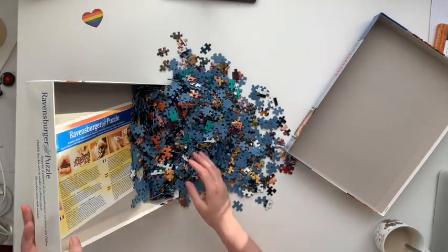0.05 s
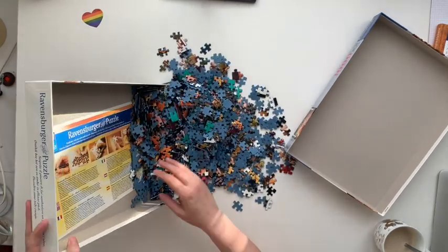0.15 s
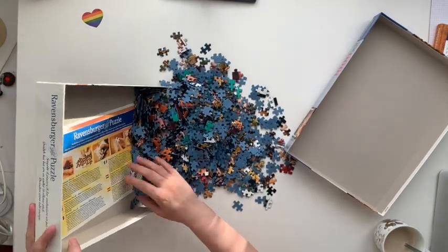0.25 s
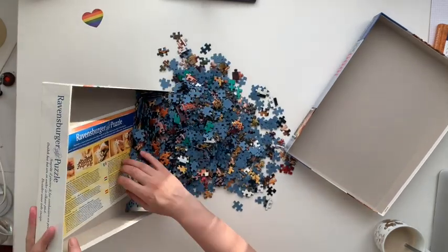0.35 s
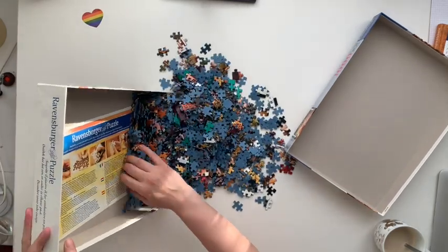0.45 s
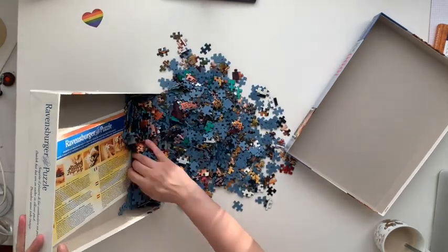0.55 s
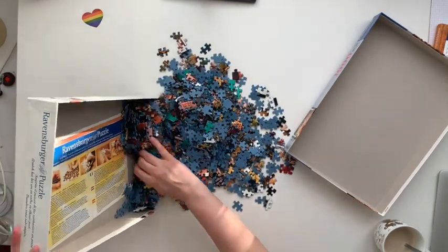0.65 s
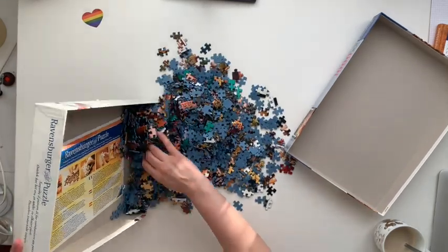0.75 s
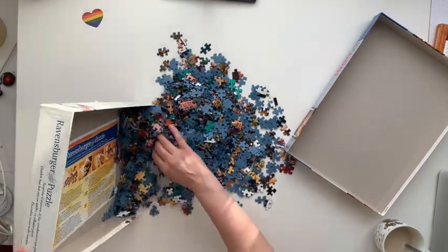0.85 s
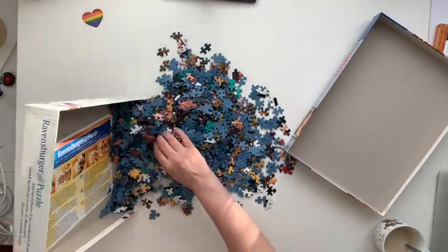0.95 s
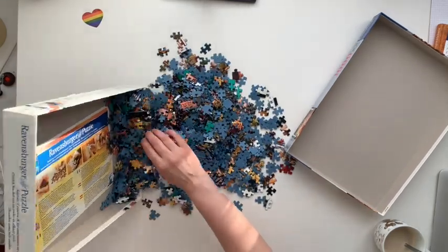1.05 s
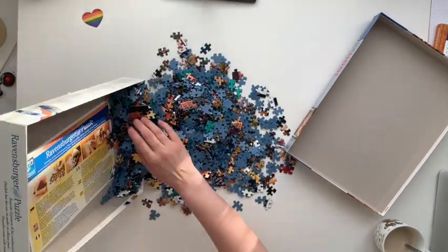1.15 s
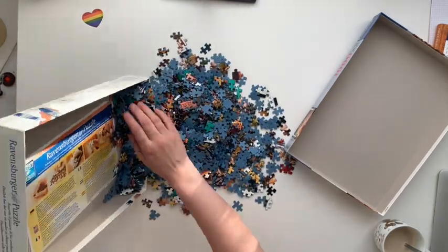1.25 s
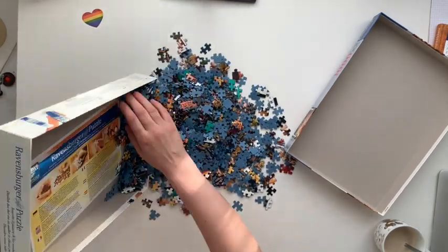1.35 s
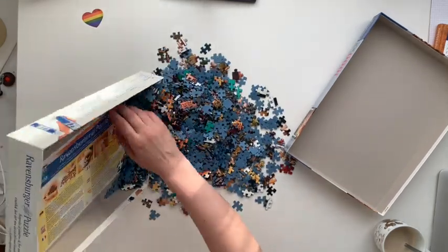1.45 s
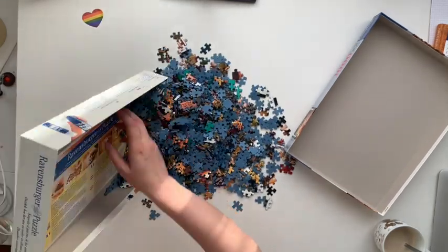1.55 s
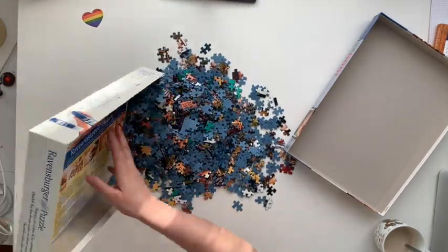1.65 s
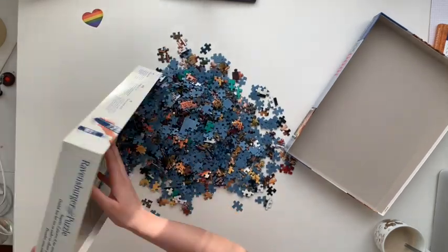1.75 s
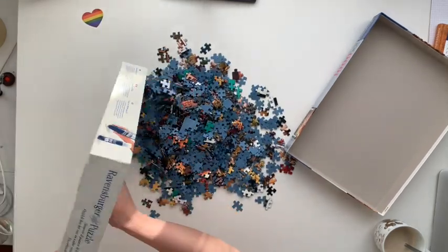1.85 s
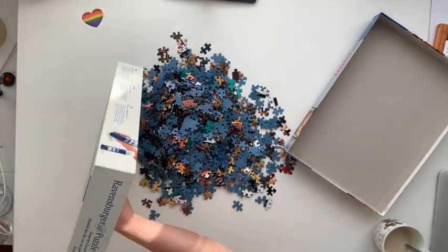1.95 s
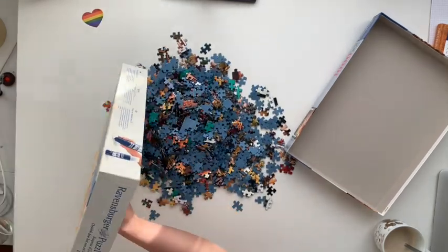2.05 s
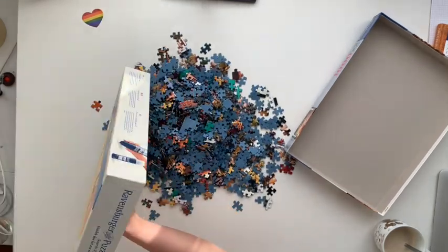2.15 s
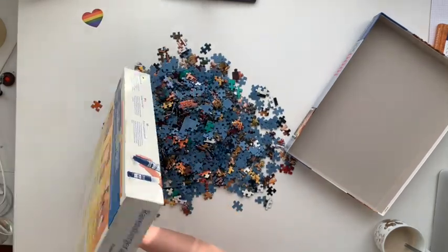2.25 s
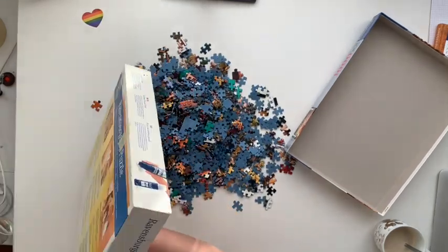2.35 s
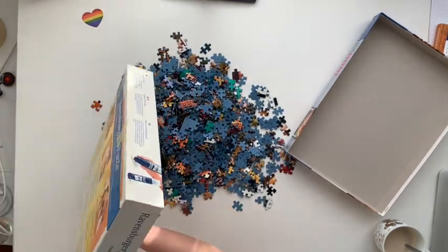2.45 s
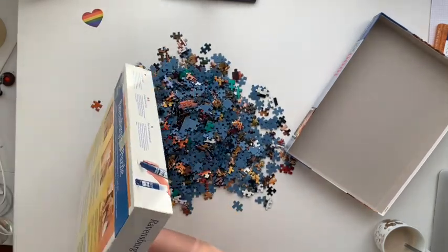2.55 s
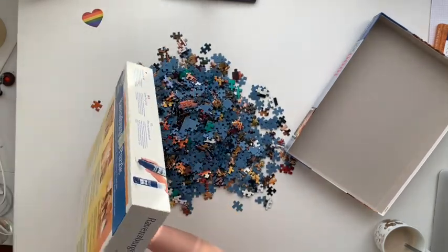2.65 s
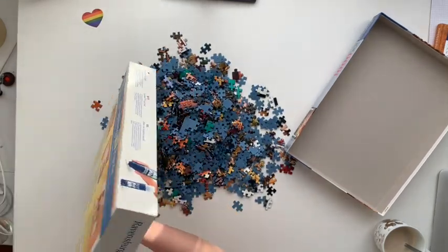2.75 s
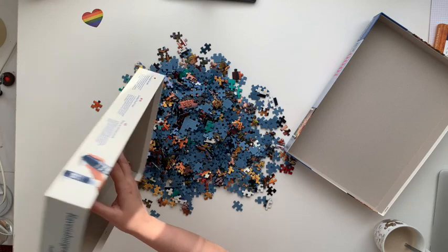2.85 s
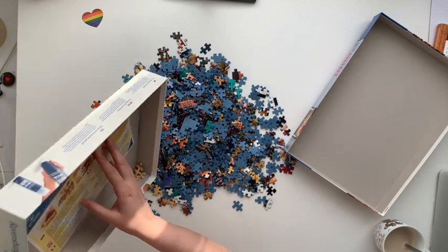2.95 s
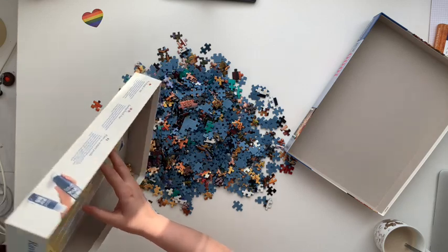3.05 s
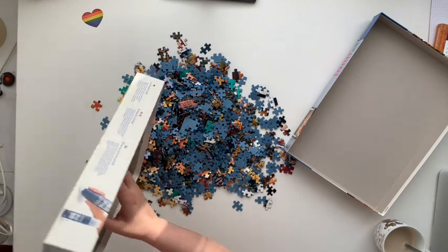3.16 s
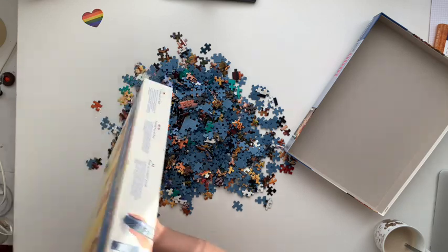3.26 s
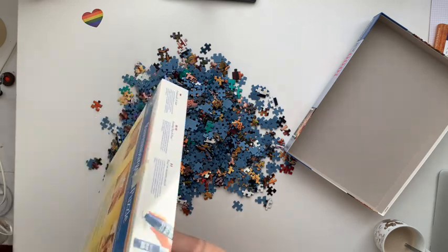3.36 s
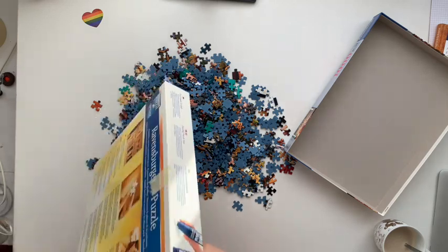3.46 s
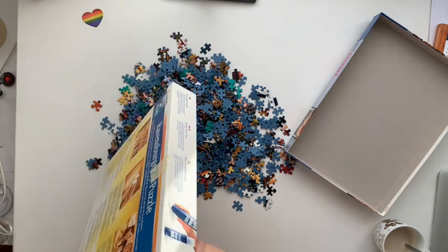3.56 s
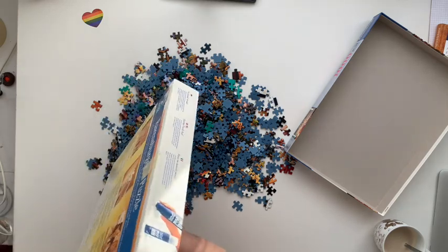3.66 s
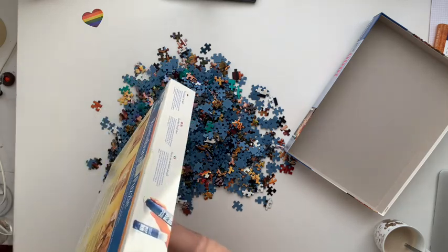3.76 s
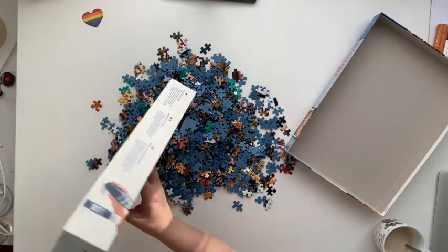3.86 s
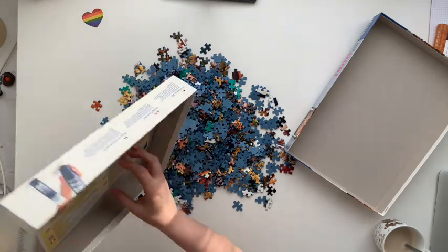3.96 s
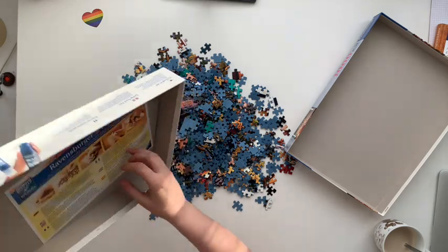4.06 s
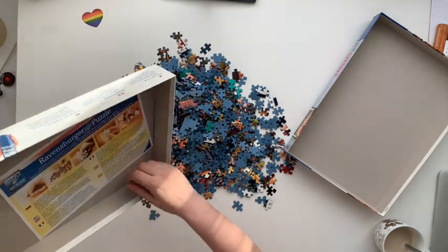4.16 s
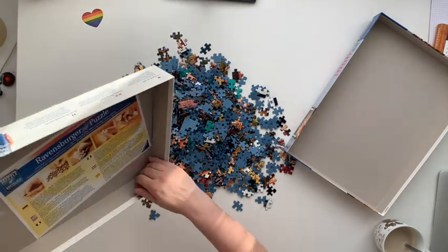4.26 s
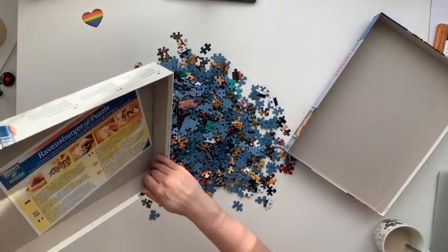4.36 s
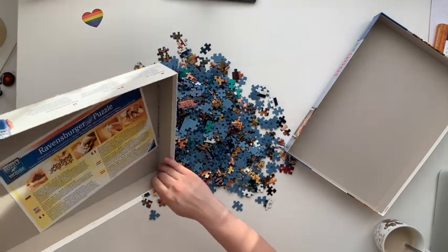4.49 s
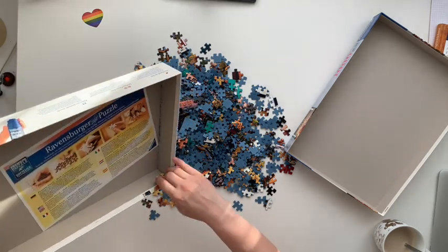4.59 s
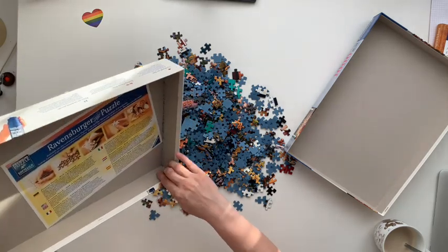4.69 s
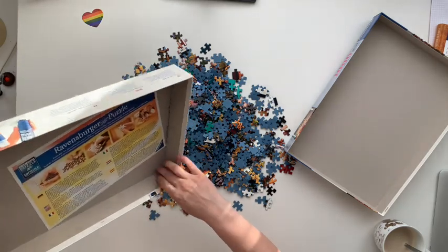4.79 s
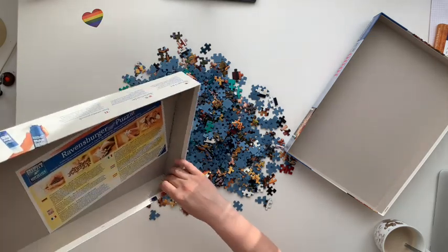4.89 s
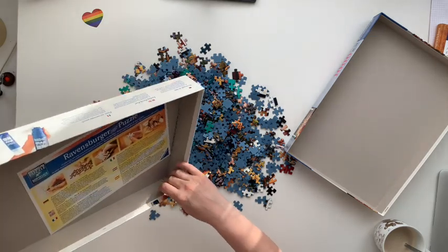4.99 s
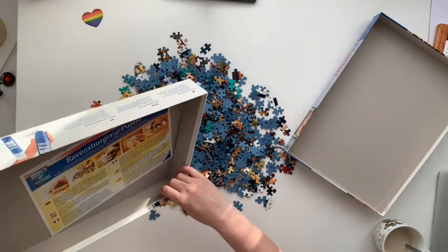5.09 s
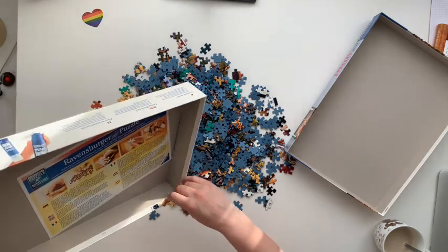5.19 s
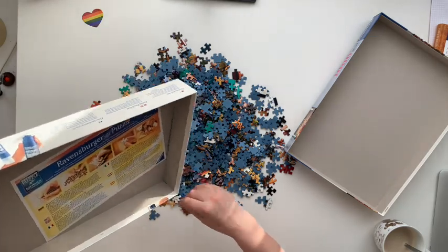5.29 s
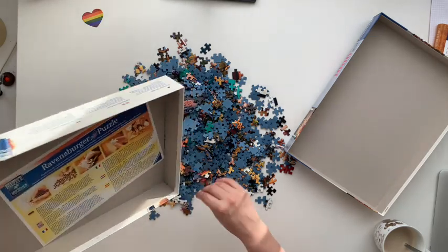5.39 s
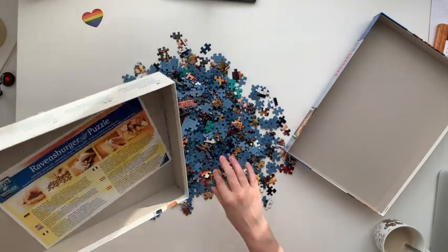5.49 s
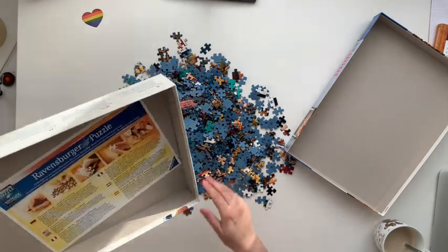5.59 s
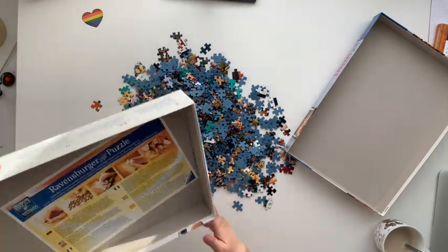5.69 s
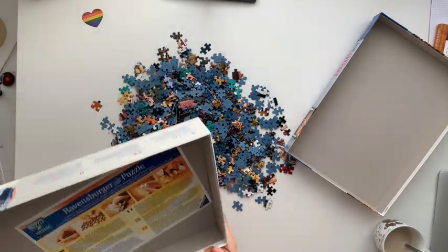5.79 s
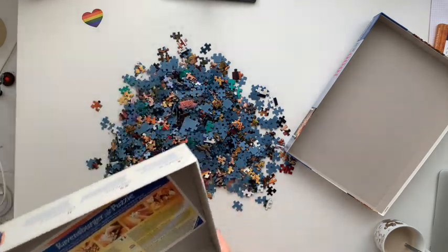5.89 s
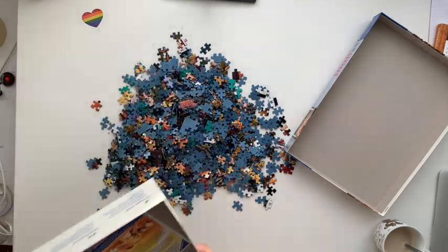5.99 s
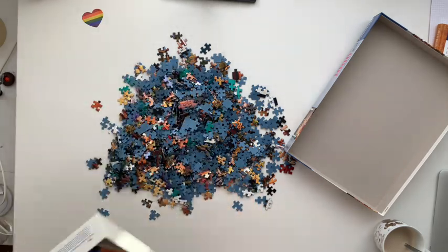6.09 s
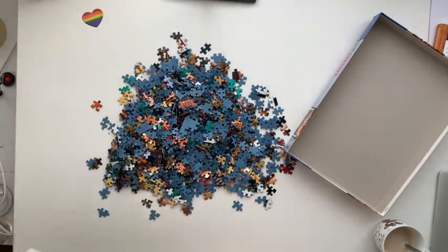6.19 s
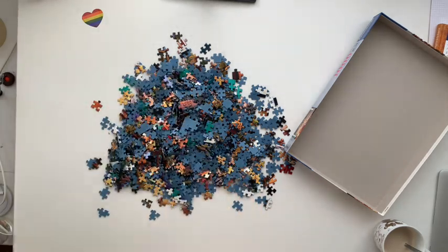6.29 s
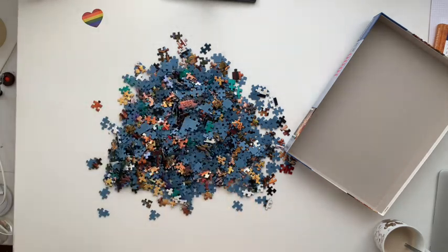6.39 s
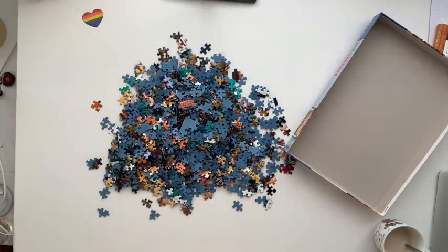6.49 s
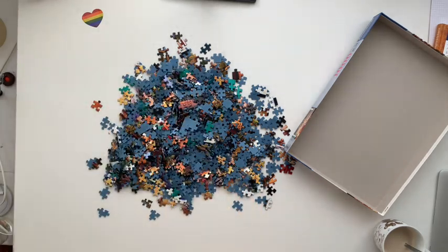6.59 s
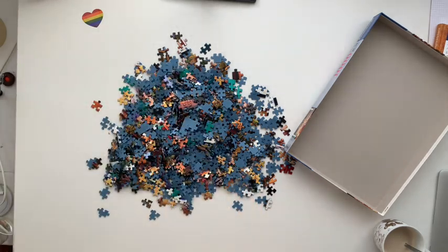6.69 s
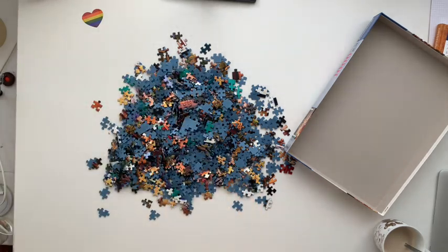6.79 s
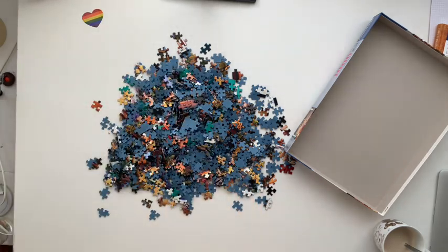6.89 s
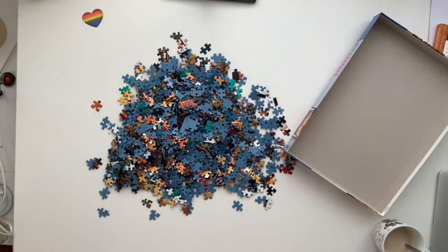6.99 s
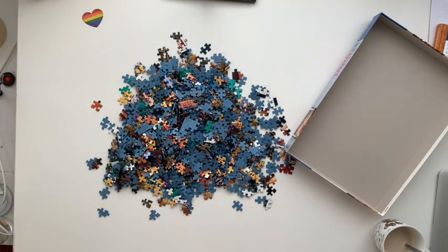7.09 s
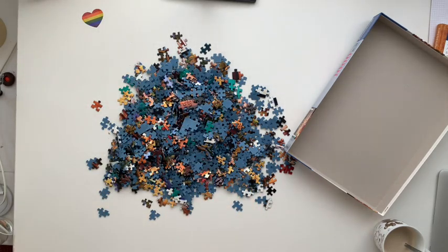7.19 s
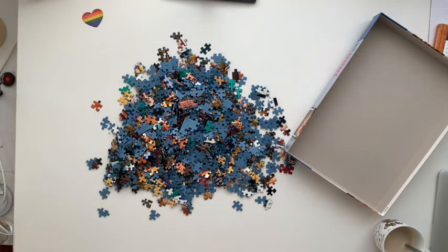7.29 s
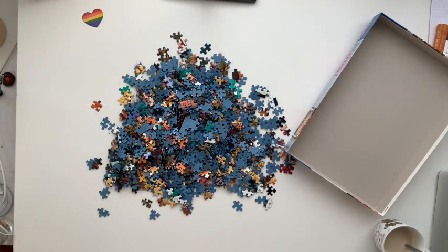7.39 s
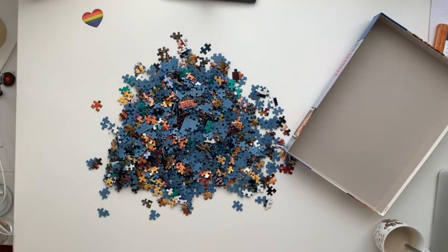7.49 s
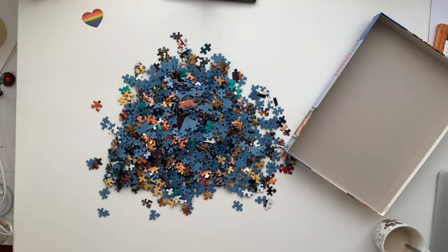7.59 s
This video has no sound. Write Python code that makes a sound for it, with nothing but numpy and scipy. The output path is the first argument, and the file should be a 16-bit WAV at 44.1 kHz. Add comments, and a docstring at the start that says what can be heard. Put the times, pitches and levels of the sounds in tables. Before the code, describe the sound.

In a quiet room, heard in stereo, puzzle pieces spill from a cardboard box onto a table with a dry, rushing rattle that swells with each sweep of a hand. The box edge drags with a short low groan and the tabletop rumbles faintly. Then the last pieces fall in sparse taps and rustles, and a run of dull box bumps fades into faint room tone.

```python
"""Cardboard puzzle pieces clatter and rustle as a hand rakes them out of a tilted box onto a table.
Their collisions ring the card and the air in the box; single pieces tap and hard edges snap.
The pour thins to a soft slide as the box is turned and put away. The box groans as it drags and knocks
as it bumps, and the table rumbles, all heard through a stereo microphone in a quiet room."""
import sys
import numpy as np
from scipy import signal
from scipy.fft import rfft, irfft, next_fast_len
from scipy.io import wavfile
from scipy.ndimage import uniform_filter1d, map_coordinates

SR = 44100
rng = np.random.default_rng(int(sys.argv[2]) if len(sys.argv) > 2 else 0)


def transcribe(signal):
    """Save signal, clipped to [-1, 1], as a 16-bit WAV file at the path in sys.argv[1]."""
    frames = np.atleast_2d(signal).T
    limited = np.clip(frames, -1, 1)
    pcm = np.round(limited * 32767).astype(np.int16)
    wavfile.write(sys.argv[1], SR, pcm)


N = 336924


def amp(db):
    return 10 ** (np.asarray(db) / 20)


def unit(x):
    return x / np.sqrt(np.mean(x ** 2) + 1e-20)


def along(points, hz):
    """Read (freq_hz, value) points on a log frequency axis."""
    freqs, values = np.transpose(points)
    return np.interp(np.log(hz + 1), np.log(freqs + 1), values)


def curves(rows):
    """One automation curve for each column after time_s."""
    times, *columns = np.transpose(rows)
    return [np.interp(np.arange(N) / SR, times, column) for column in columns]


def wobble(rate):
    """A smooth random curve, rate knots a second."""
    return map_coordinates(rng.standard_normal(int(N * rate / SR) + 4), [np.arange(N) * rate / SR])


def filtered(x, response):
    """x through a complex frequency response."""
    size = next_fast_len(N + SR // 2)
    return irfft(rfft(x, size) * response(np.fft.rfftfreq(size, 1 / SR)), size)[..., :N]


def bandpass(f, hz, width):
    return 1j * f * width / (hz * hz - f * f + 1j * f * width)


def resonant(x, modes):
    """x through parallel resonances of alternating polarity."""
    return filtered(x, lambda f: sum((-1) ** k * amp(db) * bandpass(f, hz, width)
                                     for k, (hz, width, db) in enumerate(modes)))


def coloured(x, spectrum):
    """x through an EQ curve, at unit level."""
    return unit(filtered(x, lambda hz: amp(along(spectrum, hz))))


# room tone EQ: freq_hz, gain_db
ROOM_TONE_EQ = [(18, -42.5), (30, -13), (64, -13.5), (97, -11), (213, -26), (622, -33), (4310, -46.5),
                (4660, -55.5), (6370, -39.5), (15500, -39)]
def room_tone():
    """Two channels of faint, bass-heavy air."""
    return amp(-58) * coloured(rng.standard_normal((2, N)), ROOM_TONE_EQ)


# reverb off the room's walls: freq_hz, t60_s
ROOM_DECAY = [(150, 0.24), (400, 0.14), (1400, 0.079), (4000, 0.18), (12000, 0.092)]
# scatter off things on the table: freq_hz, t60_s
SCATTER_DECAY = [(200, 0.017), (3000, 0.027), (12000, 0.00099)]
def reflections(x, decay, length, hop):
    """A diffuse tail of length samples, drawn anew every hop samples."""
    out = np.zeros(N + SR)
    for start in range(0, N, hop):
        hz, t, noise = signal.stft(rng.standard_normal(length), SR, nperseg=128)
        tail = signal.istft(noise * amp(-60 * t / along(decay, hz)[:, None]), SR, nperseg=128)[1]
        wet = signal.fftconvolve(x[start:start + hop], tail / np.linalg.norm(tail))
        out[start + 100:][:len(wet)] += wet
    return out[:N]


# texture, from smooth sliding (0) to separate collisions (1): time_s, grain_share
GRAIN = [(0, 1), (2.95, 1), (3.1, .35), (5.6, .3), (5.85, .12), (7.64, .12)]
def contacts(rate, spread_db, t60, clump_db, smooth):
    """Random collisions in clumps, a few much bigger than the rest, on the hiss of sliding card."""
    hits = rng.random(N) < rate / SR
    sizes = hits * amp(spread_db * np.minimum(rng.exponential(size=N), 4) + clump_db * wobble(25.01))
    envelope = np.convolve(sizes, amp(-60 * np.arange(SR // 40) / SR / t60))[:N]
    grain, = curves(GRAIN)
    return (grain * unit(unit(envelope) + smooth) + 1 - grain) * rng.standard_normal(N)


# tabletop EQ: freq_hz, gain_db
TABLE_EQ = [(28, -44.5), (45, -7.5), (70, -11.5), (110, -7), (160, -10), (205, -3.5), (270, -14.5),
            (500, -55.5)]
# rumble fader: time_s, level_db
RUMBLE_LEVEL = [(0, -47.5), (.19, -70), (.32, -25.5), (.38, -31), (1.1, -44), (1.45, -51.5), (1.6, -37),
                (2, -39.5), (2.8, -43.5), (3.1, -65), (3.55, -48), (4.17, -65), (4.28, -67), (4.36, -69),
                (5.47, -70.5), (5.53, -40), (5.62, -86), (5.75, -60.5), (6.05, -40), (6.5, -41.5),
                (6.6, -63), (6.64, -30), (6.71, -43), (6.75, -68), (7.64, -71.5)]
def table_rumble():
    """Blows shake the low end of the tabletop."""
    blows = contacts(400, spread_db=9, t60=0.018, clump_db=-1, smooth=0.88)
    return amp(curves(RUMBLE_LEVEL)[0]) * coloured(blows, TABLE_EQ)


# box edge dragging on the table: time_s, pitch_hz, level_db
BOX_DRAG = [(1.57, 264, -48.5), (1.591, 250.3, -18), (1.643, 239, -30.5), (1.692, 221.3, -29.5),
            (1.779, 229.2, -29), (1.852, 213, -27.5), (1.9, 183, -39), (1.974, 198, -29), (2.02, 205, -43)]
def box_groan():
    """Stick-slip of the box edge: an unsteady low tone with a weak octave."""
    hz, db = curves(BOX_DRAG)
    t = np.arange(N) / SR
    gate = np.clip(np.minimum(t - BOX_DRAG[0][0], BOX_DRAG[-1][0] - t) / 0.011, 0, 1)
    phase = 2 * np.pi * np.cumsum(hz * (1 + 0.015 * wobble(40))) / SR
    return gate * amp(db + 2 * wobble(30)) * (np.sin(phase) + .25 * np.sin(2 * phase))


# bumps against hand and furniture: start_s, level_db, pitch_hz, thump_offset_db
BOX_BUMPS = [(.294, -25.5, 431, 3.5), (0.328, -32, 396, 5.5), (1.471, -34, 419.6, -20),
             (2.226, -21, 394, -6), (2.857, -36, 552, -1), (3.509, -35.5, 485, -32.5),
             (3.528, -23, 480, -33), (3.546, -23.5, 438, -36), (4.018, -43, 450, -36),
             (4.222, -31.5, 412, -16), (4.268, -51, 385, 15), (4.579, -34, 570, -33), (5.084, -38, 656, -8),
             (5.93, -31, 387, -23), (5.954, -27.5, 410, -10), (5.998, -32, 407, 5), (6.058, -24, 389.4, -3),
             (6.148, -23.5, 387, 0), (6.246, -27, 404.6, 0), (6.35, -36, 401, 3),
             (6.609, -25.5, 402, -14.5)]
# modes of a struck box wall: pitch_ratio, gain_db, t60_s
KNOCK_MODES = [(0.521, -27, 0.065), (.75, -6, 0.08), (.98, 11.5, 0.055), (1.079, -7.5, 0.094),
               (1.6, 3.5, 0.057), (2.05, -18, 0.086), (2.5, -1.5, 0.077)]
# low tones of what the box meets: pitch_hz, gain_db
THUMP_TONES = [(65, -11), (105, 0), (165, -1)]
def box_knocks():
    """Soft blows ring the box walls, whose pitch depends on the grip, and thump what they meet."""
    out, t = np.zeros(N + SR), np.arange(SR // 3) / SR
    attack = 1 - np.exp(-t / 0.0014)
    for start, db, hz, thump_db in BOX_BUMPS:
        for delay_s, loss_db in ((0, 0), (.015, -4.5)):  # every bump lands twice
            drift = np.cumsum(rng.normal(0, 0.033, len(t)))  # lossy walls waver
            phase = 2 * np.pi * hz * t + drift
            ring = sum(amp(gain + rng.normal(0, 2.1) - 60 * t / t60) * np.sin(ratio * phase)
                       for ratio, gain, t60 in KNOCK_MODES)
            thump = sum(amp(thump_db + gain - 60 * t / 0.14) * np.sin(2 * np.pi * low_hz * t)
                        for low_hz, gain in THUMP_TONES)
            out[round((start + delay_s) * SR):][:len(t)] += amp(db + loss_db) * (ring + thump) * attack
    return out[:N]


# box wall resonances: centre_hz, width_hz, gain_db
WALL_MODES = [(198, 60, -13), (317, 50, -14), (430, 97, 3.5), (542, 17, -4), (578, 56, 3.5)]
def box_walls():
    """Sliding pieces set the box walls rumbling."""
    return unit(resonant(contacts(900, spread_db=-1.5, t60=0.031, clump_db=2.5, smooth=1), WALL_MODES))


# air in the tilted, full box: centre_hz, width_hz, gain_db
FULL_AIR = [(1128, 107, 8), (1375, 73, 10)]
# air in the turned, emptied box: centre_hz, width_hz, gain_db
EMPTY_AIR = [(789, 68, 8), (942, 72, 6)]
# how much of the heap is at the box mouth: time_s, fill_share
BOX_FILL = [(0, 0.84), (2.6, 1), (2.9, 0.36), (7.64, 0.34)]
def box_air(blows):
    """Collisions ring the air in the box; the hollow note drops as it empties."""
    fill, = curves(BOX_FILL)
    high, low = (unit(resonant(resonant(blows, air), air)) for air in (FULL_AIR, EMPTY_AIR))
    return np.sqrt(fill) * high + np.sqrt(1 - fill) * low


# bright hits on piece edges: start_s, level_db, pitch_hz, tick_offset_db
EDGE_HITS = [(0.1553, -35, 6450, -14), (0.183, -28, 8400, -16), (0.2537, -31, 6450, -14.5),
             (0.3273, -15, 9200, -3.5), (0.361, -23.5, 10800, -10), (0.379, -22, 8100, -5),
             (.4795, -26, 9600, -10.5), (0.5372, -17.5, 6800, -17.5), (0.553, -13.5, 4530, -13),
             (0.5643, -9.5, 10000, -6), (0.6646, -16.5, 6560, -14), (0.7143, -16, 7740, -19),
             (0.728, -13, 9600, -16.5), (0.744, -10, 8500, -5.5), (0.792, -12, 8200, -12.5),
             (0.813, -22, 6940, -2.5), (0.828, -19, 8750, -4), (0.9122, -19, 13700, -2.5),
             (0.9232, -11, 7220, -11.5), (0.951, -15, 8500, -17.5), (1.0364, -26.5, 6700, -12),
             (1.0492, -5, 4500, -9), (1.108, -14.5, 9400, -3.5), (1.1578, -14, 12600, -11),
             (1.1604, -8, 11540, -5.5), (1.167, -13, 11700, -6.5), (1.2088, -12.5, 9200, -12),
             (1.2496, -11.5, 12300, -10.5), (1.3934, -34.5, 8600, -4.5), (1.4932, -33, 8700, -6.5),
             (1.5166, -25, 13800, -8), (1.5406, -25, 13400, -4.5), (1.5456, -24, 5870, -8),
             (1.7945, -11, 7000, -6.5), (1.859, -9, 7500, -16), (1.8702, -5, 9960, -7),
             (1.888, -13.5, 8450, -7.5), (1.896, -8, 8620, -6.5), (1.9625, -12.5, 9400, -4),
             (2.0278, -19, 6980, -12), (2.0654, -9, 6950, -11.5), (2.0799, -9, 6970, -12.5),
             (2.0995, -18.5, 8900, -14.5), (2.128, -11, 7500, -5), (2.3755, -11.5, 8600, -13.5),
             (2.397, -15, 7450, -7), (2.4216, -7.5, 7580, -3.5), (2.563, -14.5, 9500, -14),
             (2.588, -22, 10700, -9), (2.6698, -15, 12900, -9), (2.7276, -25.5, 9000, -8.5),
             (2.737, -22, 12900, -13), (2.7764, -27.5, 8800, -1), (2.7902, -20.5, 4600, -0.5),
             (2.8707, -25, 8560, -6.5), (2.8815, -25, 8400, -2.5), (2.915, -28, 6000, -5.5),
             (2.9354, -38.5, 6600, -9.5), (2.973, -29, 6490, -7.5), (2.9797, -36, 6450, -16),
             (3.0058, -26, 4340, -11.5), (3.0685, -35.5, 14900, -9), (3.2774, -26, 6400, -15),
             (3.4228, -38.5, 4570, -20.5), (3.4917, -27, 4900, -24), (3.4976, -23.5, 5300, -29.5),
             (3.5167, -33.5, 4690, -24.5), (3.741, -25, 10900, -10), (3.7446, -24, 6670, -6),
             (3.748, -25.5, 8330, -7.5), (4.227, -28, 5320, -20), (4.5468, -41.5, 4760, -21.5),
             (4.6844, -33, 5100, -5), (4.804, -35, 5340, -17.5), (4.8367, -16, 5320, -28),
             (5.0671, -30.5, 5150, -23), (5.086, -21.5, 5270, -31.5), (5.4404, -26.5, 5020, -13),
             (5.5128, -14.5, 8960, -7), (5.527, -26.5, 4950, -11), (5.8, -37, 4690, -3.5),
             (6.01, -25.5, 3200, -26.5), (6.615, -33.5, 5100, -24)]
def edge_snaps():
    """A hard edge gives a brief high ping and a wide dry tick; weak blows are blunter."""
    out, t = np.zeros(N + SR), np.arange(SR // 30) / SR
    decay = amp(-60 * t / .006) + amp(-11 - 60 * t / .035)  # first bite, then a quieter ring
    for start, db, hz, tick_db in EDGE_HITS:
        hardness = min(amp(db + 20), 1)
        attack = 1 - np.exp(-t * hardness / .00015)
        ping = np.sin(2 * np.pi * hz * t + np.cumsum(rng.normal(0, hz / 32000, len(t))))
        tick = amp(tick_db) * (3.1 * hardness * (t == 0) + 1.3 * attack * rng.standard_normal(len(t)))
        out[round(start * SR):][:len(t)] += amp(db + 9) * decay * (attack * ping + tick)
    return filtered(out[:N], lambda f: (1j * f / (2200 + 1j * f)) ** 2)  # low cut


# single pieces landing: start_s, level_db, pitch_hz, crack_offset_db
LANDINGS = [(0.151, -22.5, 2110, -11.5), (0.174, -15.5, 1476, -9.5), (0.254, -22, 1613, -11.5),
            (0.328, -17, 1216, -2.5), (0.458, -14, 789, -15.5), (0.506, -20.5, 1528, -9),
            (0.536, -11.5, 1270, -3.5), (.551, -6.5, 1387, -1.5), (0.588, -13, 1600, -3.5),
            (0.6649, -7.5, 1462, 4), (0.925, -15, 1620, 3), (1.039, -18.5, 1418, -0.5),
            (1.142, -15.5, 1247, -11), (1.187, -10, 1223, -8.5), (1.248, -21.5, 1480, -4.5),
            (1.469, -28.5, 747, -8), (1.49, -22, 1070, -11), (1.7177, -17, 1682, -6),
            (1.784, -13, 1063, -9.5), (1.804, -15.5, 1173, -5.5), (1.858, -22.5, 1425, -14.5),
            (1.882, -6, 1196, -12.5), (1.936, -10.5, 1110, -7.5), (2.065, -19.5, 1710, -8),
            (2.126, -21, 1040, -10), (2.144, -12, 1085, -1), (2.346, -16.5, 1166, -8.5),
            (2.39, -11, 1209, -11), (2.42, -13.5, 1990, -8.5), (2.472, -16.5, 1160, -15.5),
            (2.55, -11, 1200, -9.5), (2.668, -23, 1800, -6), (2.712, -13.5, 1178, -3),
            (2.726, -19, 789, -10), (2.79, -22.5, 2197, -14.5), (2.858, -13.5, 789, -14),
            (3.281, -25, 1436, -6.5), (3.353, -38, 1253, -18.5), (3.423, -22, 767, -4),
            (3.4915, -13, 1464, -12), (3.518, -10, 1653, -9.5), (3.524, -17.5, 1573, -9.5),
            (3.561, -10.5, 1563, -10), (3.585, -16.5, 1143, -3.5), (3.746, -21, 1496, -14.5),
            (3.995, -42.5, 980, -7.5), (4.083, -27, 1173, -21), (4.21, -23.5, 995, -10),
            (4.227, -34, 880, -8), (4.368, -20, 1005, -6.5), (4.503, -27, 793, -18),
            (4.5463, -13, 1112, -15.5), (4.566, -23, 775, -16), (4.589, -26, 1620, -12),
            (4.694, -26.5, 1110, -8), (4.79, -30, 797, -9), (4.8365, -17, 1110, 2), (4.864, -24, 1203, -9),
            (4.938, -23.5, 1950, -3), (5.068, -20, 1097, -15.5), (5.085, -11, 789, -12.5),
            (5.438, -28.5, 1545, -7), (5.512, -31.5, 859, -12), (5.839, -30.5, 1573, 0.5),
            (5.913, -32, 997, -6), (6.005, -29, 966, -5), (6.06, -20, 950, -25), (6.615, -28.5, 1026, -11),
            (7.365, -51, 1520, -5.5), (7.491, -46.5, 900, -20)]
def piece_taps():
    """Each landing is a crack, a pitched knock and a dying rattle heard through card and walls."""
    low_cut_hz, high_cut_hz = 465, 6100  # landings carry little deep bass and little top
    t = np.arange(SR // 8) / SR
    ring = amp(-60 * t / 0.12)
    tones, rattles = np.zeros((2, N + len(t)))
    for start, db, hz, crack_db in LANDINGS:
        attack = 1 - np.exp(-t / (.0006 * amp(-crack_db - 6)))  # a softer blow rises slower
        rattle = attack * (0.2 * ring + amp(-60 * t / 0.012)) * rng.standard_normal(len(t))
        drift = np.cumsum(rng.normal(0, 0.11, len(t)))  # card is lossy: the note wavers
        crack_decay = 2.3 * amp(-60 * t / 0.0018) + 0.32 * amp(-60 * t / 0.067)
        crack = amp(crack_db) * crack_decay * np.sin(2 * np.pi * 3600 * t + drift)
        knock = attack * (amp(-60 * t * hz / 14) + 1.64 * ring) * np.sin(2 * np.pi * hz * t + drift)
        first_swings = 2.8 * attack * amp(-60 * t / .006) * np.sin(2 * np.pi * 1700 * t)
        span = slice(round(start * SR), round(start * SR) + len(t))
        tones[span] += amp(db) * (amp(-7) * knock + first_swings + crack)
        rattles[span] += amp(db) * rattle
    pitched = filtered(tones[:N], lambda f: (1j * f / (low_cut_hz + 1j * f)) ** 2)
    card = amp(15.5) * resonant(rattles[:N], CARD_MODES)
    undamped = np.clip(1.1 - curves(BOX_FILL)[0], 0, 1)  # a full heap damps the walls
    walls = amp(-7.5) * resonant(rattles[:N] * undamped, WALL_MODES)
    return filtered(pitched + card + walls,
                    lambda f: high_cut_hz ** 2 / (high_cut_hz ** 2 - f * f + 1.4j * f * high_cut_hz))


def flicker(x, depth_db):
    """Each passing piece favours its own bands for a moment."""
    bands = signal.stft(x, nperseg=256)[2]
    gains = uniform_filter1d(rng.standard_normal(bands.shape), size=3, axis=0)
    gains = uniform_filter1d(gains, size=7, axis=1)
    return unit(signal.istft(bands * amp(depth_db * unit(gains)), nperseg=256)[1][:N])


# EQ of tumbling piece edges: freq_hz, gain_db
EDGE_EQ = [(3500, -3), (5600, -0.5), (7000, 1), (8600, 0.5), (11000, -3.5), (13500, -11.5), (16000, -2)]
def edge_pings(rate, spread_db, count):
    """Edges of tumbling pieces strike brief high notes, each on one of count pitches."""
    pitches = np.geomspace(5320, 13750, count)[:, None]
    note, when, size = rng.random((3, round(rate * N / SR)))
    strength = amp(spread_db * np.minimum(-np.log(size), 4.5))
    blows = np.zeros((count, N))
    blows[(note * count).astype(int), (when * N).astype(int)] = strength
    notes = filtered(blows, lambda f: amp(along(EDGE_EQ, pitches)) * bandpass(f, pitches, width=210))
    return unit(notes.sum(axis=0))


# faces of pieces rubbing: centre_hz, width_hz, gain_db
SCUFF_MODES = [(3510, 3300, -2.5), (5300, 890, -1.5)]
# EQ of hand and stray pieces sliding on the bare lid: freq_hz, gain_db
BRUSH_EQ = [(3500, -9.5), (5600, 5), (7200, -3), (9000, -1), (12000, -5), (16000, -3.5)]
# high shelf on the rustle: time_s, gain_db
SHEEN_GAIN = [(0, 2), (.3, -2.5), (.5, 2), (1.05, 3), (1.2, 6), (1.5, -2.5), (2, 4.5), (2.6, 4.5),
              (3.22, 0), (3.3, 3.5), (3.45, 2), (3.58, -5), (3.72, 0), (3.9, -2.5), (4.07, 11), (4.23, -2),
              (4.5, -0.5), (4.72, -3), (4.94, 0), (5.08, -5.5), (5.2, 2.5), (5.45, -21), (5.53, 0.5),
              (5.85, 0.5), (6.5, 1.5), (7.64, 3)]
def piece_rustle(blows, scuff_db, shelf_hz=8000):
    """Edges tick and ping while faces scuff; as the pour ends, brushing on the lid takes over."""
    ticks = 0.4 * blows + 0.75 * contacts(2400, spread_db=5.5, t60=0.003, clump_db=3, smooth=0.3)
    pouring = curves(GRAIN)[0] ** 2
    edges = coloured(ticks, EDGE_EQ) + amp(-10.5) * edge_pings(900, spread_db=6.5, count=8)
    scuff = amp(scuff_db) * unit(resonant(resonant(ticks, SCUFF_MODES), SCUFF_MODES))
    rustle = pouring * edges + (1 - pouring) * coloured(ticks, BRUSH_EQ) + scuff
    rustle = flicker(rustle, depth_db=2.8) * np.std(rustle)
    top = filtered(rustle, lambda f: 1 / (1 + (shelf_hz / (f + 1)) ** 6))
    return rustle + (amp(curves(SHEEN_GAIN)[0]) - 1) * top


# steady slide of pieces, hand and box: time_s, clatter_db, rustle_offset_db
SLIDE = [(0, -30.5, -12.5), (.13, -53, -3.5), (.3, -28.5, -28.5), (.45, -29, -2.5), (.56, -19, -4),
         (.75, -19, 0), (.95, -20.5, -2), (1.2, -22, -1), (1.37, -38.5, -0.5), (1.46, -47, 1),
         (1.6, -31, -2.5), (1.8, -22, -2), (1.92, -18.5, 5.5), (2.12, -24, -1.5), (2.5, -22.5, -3.5),
         (2.66, -30.5, 3), (2.9, -32.5, -5), (3.03, -52.5, -6), (3.19, -70, 5), (3.3, -49.5, -13),
         (3.85, -46, -6.5), (4.18, -77, -17), (4.26, -44.5, -7), (5.15, -44, -21), (5.3, -83, 6.5),
         (5.42, -70.5, 8.5), (5.64, -63, 4), (5.8, -43.5, -2), (5.89, -45, 2.5), (5.97, -38, -4),
         (6.1, -43, -8), (6.22, -45, -13), (6.42, -39, -8), (6.6, -45.5, -15), (6.75, -62, -2),
         (6.85, -56, -1.5), (7.15, -53, -0.5), (7.47, -68, 0.5), (7.5, -58.5, 1), (7.64, -53, -10)]
# handfuls pushed or shaken loose: peak_s, rise_s, hold_s, clatter_db, rustle_offset_db, air_offset_db
HANDFULS = [(0.169, 0.023, 0.015, -29, -24.5, -29), (0.325, 0.028, 0.046, -30, 5.5, -26),
            (0.535, 0.07, 0.087, -18, -17.5, -8), (1.046, 0.011, 0.024, -20.5, -3.5, -14.5),
            (1.181, 0.038, 0.01, -34.5, -9.5, 12), (1.481, .008, .04, -40.5, 4.5, 4),
            (1.638, 0.038, 0.02, -24.5, -16.5, -2), (1.797, 0.1, 0.0069, -27.5, -6, 9.5),
            (2.042, .04, 0.017, -36.5, -4.5, -15), (2.148, .03, .015, -25, 5.5, -19),
            (2.257, 0.11, .05, -24.5, -23, 9), (2.405, 0.092, 0.006, -18.5, 4.5, -20.5),
            (2.475, .03, 0.068, -34.5, -13.5, 12.5), (2.714, 0.013, 0.011, -28.5, -19.5, 3),
            (2.84, 0.02, 0.024, -35, -10, -17), (3.005, 0.014, 0.015, -41, 1, -17),
            (3.237, .008, .03, -55.5, 9, -9), (3.286, 0.046, 0.026, -37, 5, -7),
            (3.351, .015, 0.022, -36, -9, -4.5), (3.417, 0.0066, 0.037, -33, -28, -0.5),
            (3.502, .015, 0.11, -25.5, -32.5, -2.5), (3.581, 0.05, 0.035, -44, 7, -3),
            (3.654, .03, 0.014, -44, 4.5, 2), (3.747, 0.0089, 0.036, -47, 10, -5),
            (3.882, 0.2, 0.011, -43, -1.5, 6.5), (3.996, 0.027, 0.035, -39.5, -14.5, 4.5),
            (4.038, 0.027, 0.046, -48.5, 7, 2.5), (4.221, 0.013, 0.02, -34.5, 1, 3),
            (4.306, .012, .03, -52, 9, -10), (4.351, 0.09, 0.035, -39, 3.5, -23),
            (4.509, 0.021, 0.025, -37.5, -17, 2.5), (4.554, 0.0073, 0.016, -39, -31.5, 6),
            (4.668, 0.18, 0.053, -39, -3.5, -13), (4.795, .006, .03, -44, 0, -10),
            (4.854, 0.023, 0.018, -32, -3, -20.5), (4.927, 0.045, 0.021, -31, 0.5, -18),
            (5.065, .015, 0.012, -35, -18.5, -2), (5.154, 0.03, 0.034, -35.5, -2.5, -1.5),
            (5.441, 0.01, 0.023, -36.5, 2, -33), (5.512, .003, 0.03, -36.5, 8.5, -27),
            (5.834, .03, 0.0055, -34.5, -4, -17), (6.045, .01, 0.031, -49.5, -14.5, -2),
            (6.15, .01, 0.014, -69, -20, -4.5), (6.272, 0.0089, 0.023, -44, -16, 3),
            (6.622, .008, 0.02, -40, -26, 1.5)]
def raking(slide_air_db):
    """Clatter, rustle and box air gains: the steady slide plus each handful's rise, hold and fall."""
    rise_db, fall_db_per_s = 18.5, np.array([[298], [602], [298]])  # the rustle dies fastest
    t = np.arange(N) / SR
    slide_db, slide_rustle_db = curves(SLIDE)
    power = amp([slide_db, slide_db + slide_rustle_db, slide_db + slide_air_db]) ** 2
    for peak, rise, hold, db, rustle_db, air_db in HANDFULS:
        span = slice(round(max(peak - 3 * rise, 0) * SR), round((peak + hold + .3) * SR))
        age = t[span] - peak
        shape_db = rise_db * np.minimum(age / rise, 0) - fall_db_per_s * np.maximum(age - hold, 0)
        power[:, span] += amp(shape_db + db + [[0], [rustle_db], [air_db]]) ** 2
    return np.sqrt(power)


# resonances of the heaped card: centre_hz, width_hz, gain_db
CARD_MODES = [(907, 350, -1.5), (1520, 540, 2.5), (1950, 560, 2), (2810, 1170, -5)]
# balance as the box is tilted and gripped: time_s, walls_offset_db, air_offset_db, scuff_offset_db
GRIP_MIX = [(0, -16.5, -20, -4), (.35, -5, -24, -6.5), (.55, -10.5, -16, -6), (.9, -15.5, -10, -5),
            (1.2, -17.5, -15, -10.5), (1.5, -0.5, 0, -4), (1.9, -12.5, -6.5, -8), (2.4, -15.5, 1, -5),
            (2.8, -19.5, -18.5, -5), (3.4, -6.5, -10, -3.5), (4, -2.5, -14, -10.5), (4.5, -8.5, 0, 2),
            (5.2, -10.5, -0.5, -0.5), (5.6, -13, -2, -11), (5.85, 0, 3, -2.5), (6.1, 0.5, -6, -2),
            (6.6, -3, -4, 7.5), (6.9, -10, -16, -6.5), (7.64, -3, -31, 7.5)]
def pouring_pieces():
    """Colliding pieces clatter, rustle and sound the box, swelling with each rake of the hand."""
    walls_db, air_db, scuff_db = curves(GRIP_MIX)
    clatter_gain, rustle_gain, air_gain = raking(air_db)
    blows = contacts(1900, spread_db=5, t60=0.014, clump_db=1.6, smooth=0.34)
    clatter = flicker(resonant(blows, CARD_MODES), depth_db=1.5)
    rustle = piece_rustle(blows, scuff_db)
    walls = amp(walls_db) * box_walls()
    return clatter_gain * (clatter + walls) + air_gain * box_air(blows) + rustle_gain * rustle


def scene():
    """Direct sound in the mid channel, table scatter in the side, reverb and room tone in both."""
    transients = piece_taps() + edge_snaps()
    direct = pouring_pieces() + table_rumble() + transients + box_knocks() + box_groan()
    ambience = room_tone()
    scatter = reflections(direct, SCATTER_DECAY, SR // 30, SR // 20)
    send = direct - 0.16 * transients  # taps and snaps stay a little drier
    reverb = np.array([reflections(send, ROOM_DECAY, SR // 3, SR // 4) for _ in range(2)])
    return np.array([direct, scatter]) + amp(-5.5) * reverb + ambience


# how far the right channel trails the left: freq_hz, lag_half_cycles
STEREO_LAG = [(0, 0), (700, -.1), (1700, 0), (3000, .3), (4680, 1), (9000, 3), (13350, 5), (17700, 7)]
# likeness of left and right: freq_hz, correlation
STEREO_LIKENESS = [(30, 0.995), (60, 0.99), (150, 0.97), (300, 0.94), (600, 0.75), (900, 0.78), (1400, 0.9),
                   (2500, 0.7), (4000, 0.54), (15000, 0.71)]
def record(dry):
    """The loudest blows are rounded off, mid and side are spread to stereo, and both ends are trimmed."""
    low_cut_hz, high_cut_hz, slope_hz = 46.3, 15800, 300
    def response(hz):
        turn = np.pi * np.interp(hz, *np.transpose(STEREO_LAG))
        treble = hz > 4000
        width = np.where(treble, np.sin(turn) ** 2, 1)  # treble has no side where in step or opposed
        angle = np.arccos(np.clip(1 - (1 - along(STEREO_LIKENESS, hz)) * width, 0, 1)) / 2
        mid, side = np.cos(angle), np.sin(angle)
        lag = np.exp(1j * (turn - 0.5 * treble * np.sin(2 * turn)) / 2)
        spread = np.array([[mid * lag, side * lag], [mid / lag, -side / lag]])
        high_cut = np.clip((high_cut_hz - hz) / slope_hz + .5, 0, 1) ** 2
        return spread * high_cut / np.sqrt(1 + (low_cut_hz / (hz + 1)) ** 4)
    rounded = dry / (1 + np.abs(dry / 1.5) ** 4) ** (1 / 4)
    left, right = filtered(rounded[None], response).sum(axis=1)
    return np.array([left * amp(-7.5), right * amp(-7.0)])


dry = scene()
out = record(dry)
transcribe(out)
```